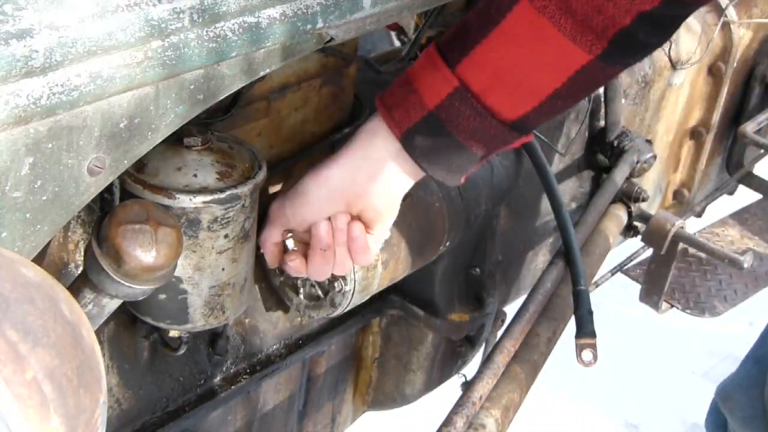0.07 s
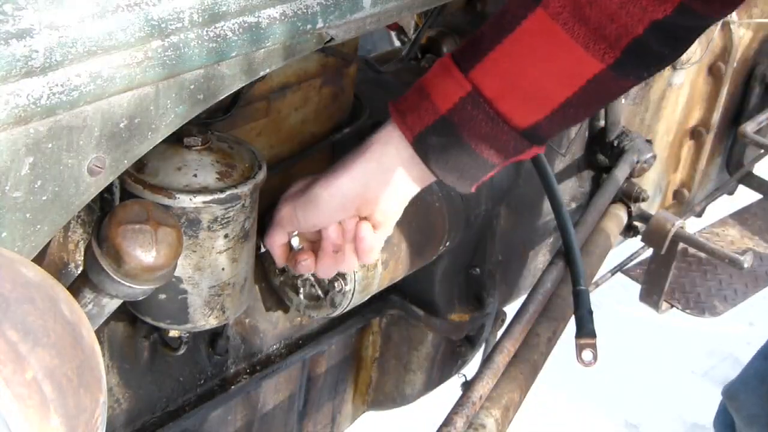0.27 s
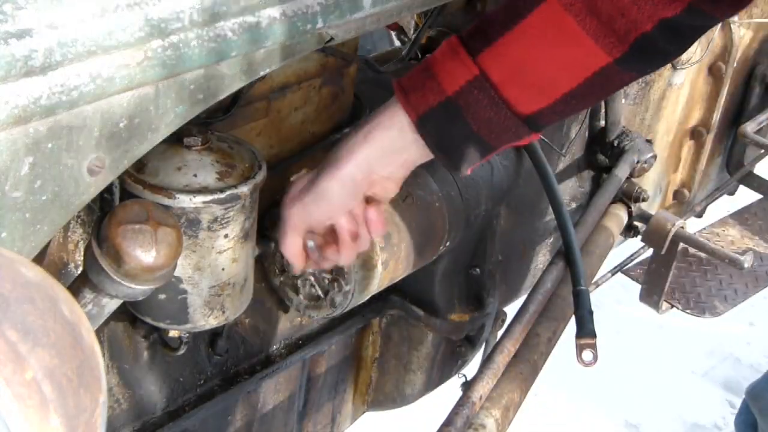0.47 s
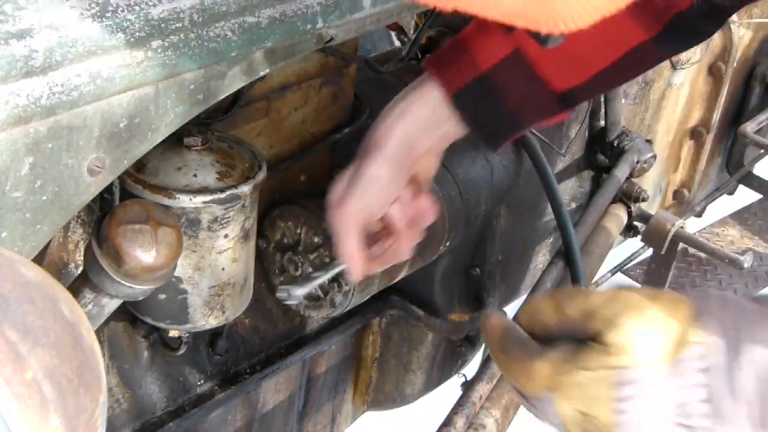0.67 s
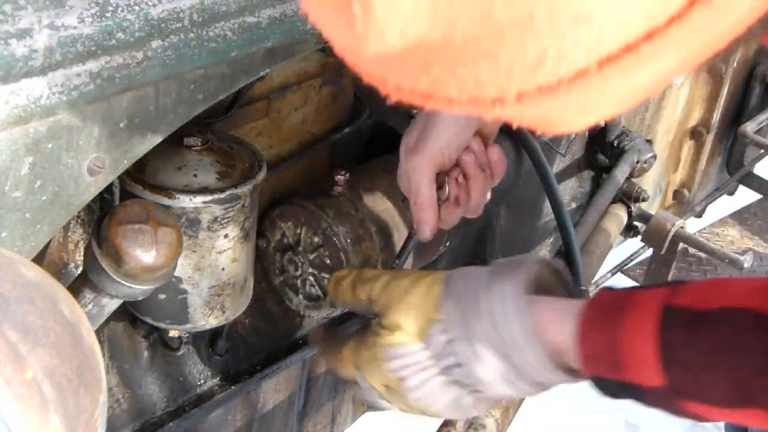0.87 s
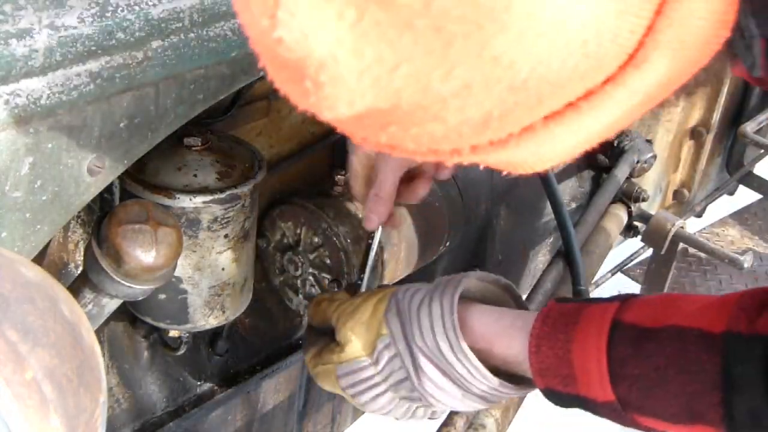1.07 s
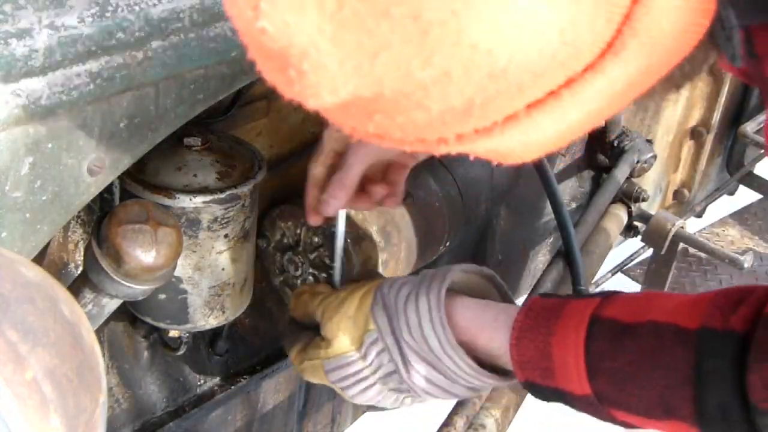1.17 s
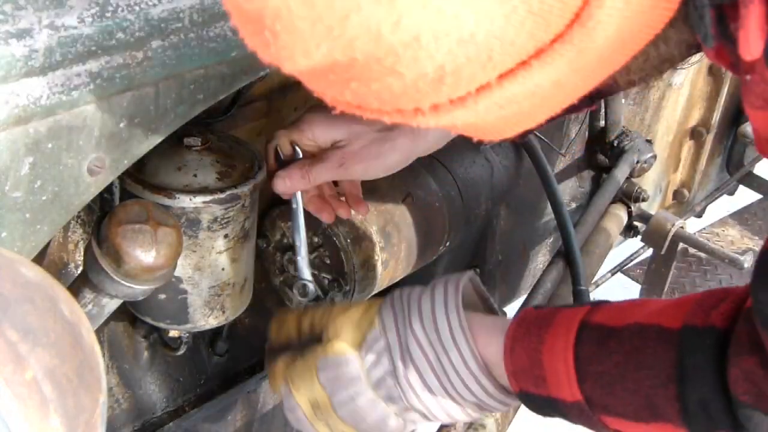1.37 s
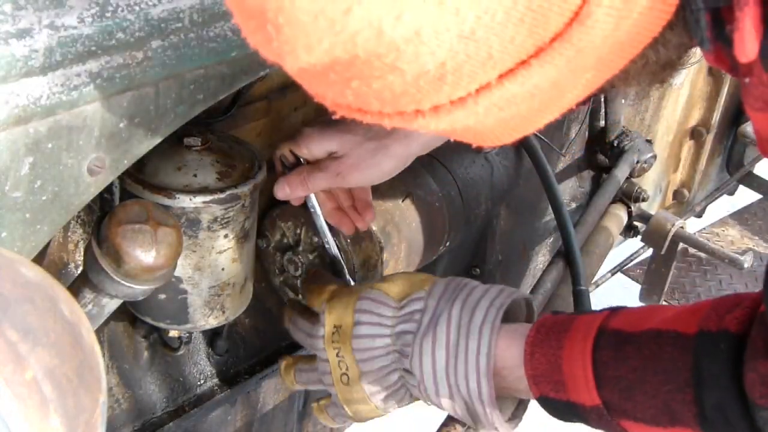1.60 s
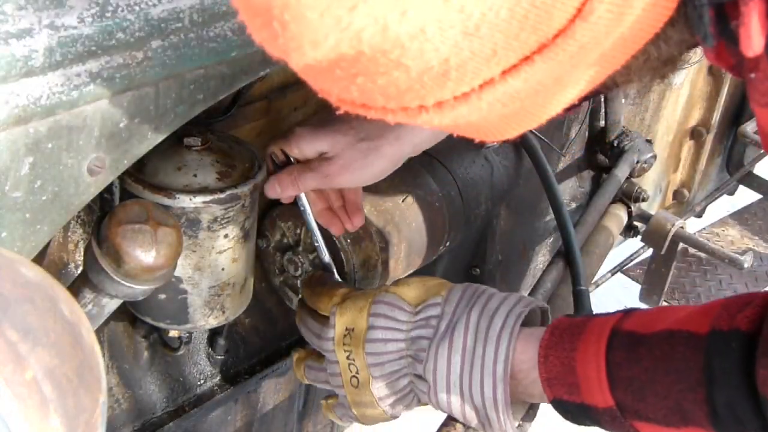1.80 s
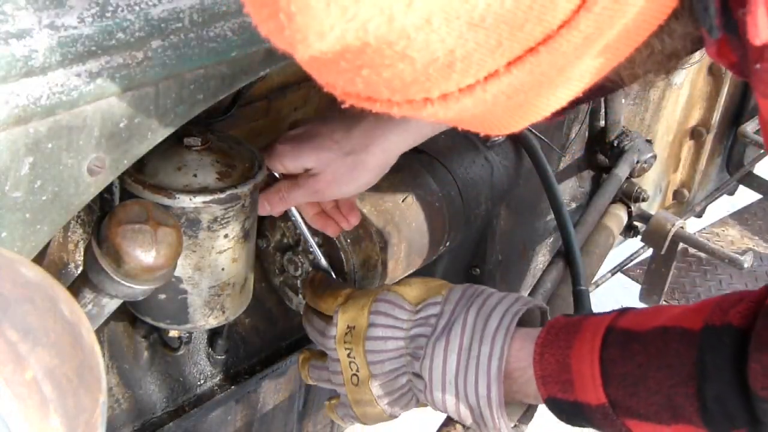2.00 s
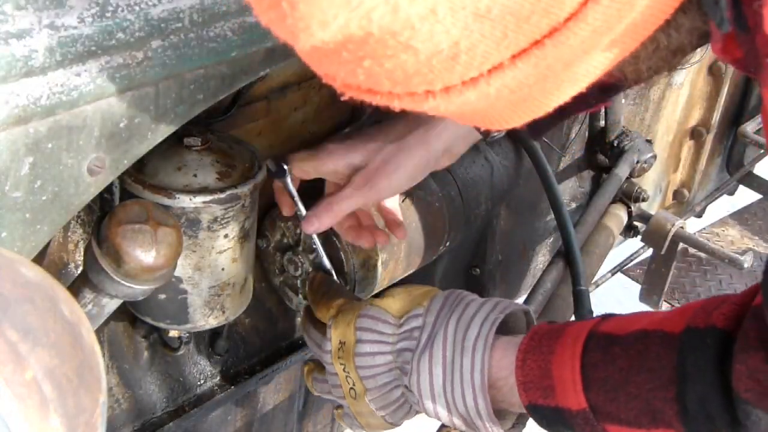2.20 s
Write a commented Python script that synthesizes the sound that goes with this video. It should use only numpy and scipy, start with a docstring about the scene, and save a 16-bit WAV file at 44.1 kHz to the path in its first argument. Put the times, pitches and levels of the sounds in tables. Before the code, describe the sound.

Wrench clicks on a bolt, close and dry in stereo. Soft dull hand knocks and low rubbing at 0.2-0.4 s; a bright, bouncing steel click pair at 0.56-0.6 s. Cloth rustles around 1 s with muffled knocks at 1.03-1.16 s. A click at 1.62 s leaves a faint housing hum; small gritty scrapes and a weak tick lead to a sharp click at 2.0 s. Quiet, wide background hiss.

```python
"""Wrench on a starter-motor bolt

At an engine, a close stereo pair hears a steel wrench fitted to a bolt: noise cracks over ringing modes,
while the motor housing swells into a hum after the clicks and short slides scrape as trains of slips.
Hands knock softly and dully near the microphones, as brief low swings with a rattle and a tick.
A sleeve rustles and something rubs low, both shaped noise, over a quiet, wide noise floor.
"""
import sys
import numpy as np
from scipy import signal
from scipy.fft import rfft, irfft, next_fast_len
from scipy.io import wavfile
from scipy.ndimage import map_coordinates

SR = 44100
rng = np.random.default_rng(int(sys.argv[2]) if len(sys.argv) > 2 else 0)


def unload_wav(signal):
    """Save mono or channel-first audio to the path in sys.argv[1] as 16-bit WAV at rate SR, clipped to [-1, 1]."""
    wavfile.write(
        sys.argv[1],
        SR,
        np.round(np.clip(np.atleast_2d(signal).T, -1, 1) * 32767).astype(np.int16),
    )


N = 99225  # samples in the scene
T = np.arange(SR * 3 // 5) / SR  # seconds since the start of one event


# Ringing modes of the wrench: [pitch_hz, level_db]
WRENCH = [(1350, -10), (2790, -9), (3290, -2), (3550, -7), (3830, -5), (4300, -5), (4750, -6), (4970, -6),
          (5190, -2), (6230, -2), (6850, -7), (7600, -6), (8330, -3), (8620, -7), (9140, 1.5), (9750, -5),
          (10720, -9), (11500, -7), (12130, -9), (13930, -3)]
WRENCH_T60_S = 0.04  # before any length factor


def wrench_modes():
    """The wrench's modes all die at one speed."""
    return [(hz, db, WRENCH_T60_S) for hz, db in WRENCH]


# Wrench contacts: [start_s, crack_db, wrench_db, bolt_db, housing_db, tilt_db_per_octave,
# first_region_hz, first_region_db, second_region_hz, second_region_db, decay_length_factor].
# The point of contact favours or mutes the two regions in the crack and the wrench.
CONTACTS = [ (0.5599, -35.5, -30.5, -21.5, -40, -4.5, 3700, 8.7, 11000, 10, 1.06),
            (0.6011, -23.5, -23, -19, -41.5, 1.5, 9100, 2.6, 4340, -1.5, 0.54),
            (1.6214, -26, -29, -27.5, -32, -1.5, 3390, 9, 4500, 3.5, 1),
            (1.8419, -34.5, -36.5, -69, -56, -2, 6350, 13.7, 11050, 15, 0.65),
            (2.0017, -24, -25.5, -21.5, -31.5, -1.5, 8880, 12.1, 6730, -30, 0.47),
            (2.004, -30.5, -39.5, -26, -44, -2.5, 5200, 21.8, 13500, 21, 0.55)]
# The wrench bouncing on the bolt: [start_s, level_db]
REBOUNDS = [(0.5628, -21.5), (0.5661, -18.5), (0.5722, -34), (0.6103, -29), (0.6270, -34)]
# Dense, quickly dying part of a click: [band_centre_hz, level_db, t60_s before the length factor]
CRACK = [(370, -25, 0.02), (800, -17, 0.083), (1340, -10.5, 0.064), (2360, -19, 0.17), (3700, -18, 0.17),
         (7500, 2, 0.026), (13100, -13, 0.02)]
# Ringing modes of the bolt: [pitch_hz, level_db, t60_s before any length factor]
BOLT = [(1950, -9, .04), (2078, -1, .042), (2385, -1, .04), (2490, -7, .065)]
# Humming modes of the motor housing: [pitch_hz, level_db, t60_s]
HOUSING = [(233.5, -5, 0.67), (272.4, 3.5, 0.26), (323.7, 0, 0.26), (390, -8.5, 0.3)]
CRACK_ATTACK_S, METAL_ATTACK_S, HOUSING_ATTACK_S = 0.00047, 0.00034, 0.021
SNAP_DB, SNAP_S = 14, 0.00061  # extra burst at the very start of a crack
CRACK_WIDTH = 0.33  # side over mid
FOCUS_OCTAVES = 0.14  # reach of a favoured or muted region
BOLT_BLUR = 2.6  # unsteadiness of the bolt's phase
PAN_DB = 2  # wrench leans to the first microphone, bolt to the second
CONTACT_LOW_CUT_HZ = 154


def wrench():
    """Contacts crack and ring the wrench by where they land, ring the bolt and hum the housing; rebounds ring the bolt."""
    out = np.zeros((2, N))
    pan = amp([[PAN_DB / 2], [-PAN_DB / 2]])
    snap = (1 + amp(SNAP_DB) * np.exp(-(T / SNAP_S) ** 2)) / 2
    for (s, crack_db, wrench_db, bolt_db, housing_db, tilt_db,
         first_hz, first_db, second_hz, second_db, length) in CONTACTS:
        def excite(hz):
            """Gain of crack and wrench at one frequency for this point of contact."""
            def near(centre):
                return np.exp(-(np.log2(hz / centre) / FOCUS_OCTAVES) ** 2)
            tilt = tilt_db * np.log2(hz / 5000)
            return amp(tilt + first_db * near(first_hz) + second_db * near(second_hz))

        crack = amp(crack_db) * burst(CRACK, CRACK_WIDTH, excite, length)
        crack = crack * rise(CRACK_ATTACK_S) * snap
        steel = amp(wrench_db) * ring(wrench_modes(), blur=5.0, gain=excite, length=length)
        bolt = amp(bolt_db) * ring(BOLT, BOLT_BLUR, length=length)
        # the hum reaches both microphones alike
        hum = amp(housing_db) * ring(HOUSING, blur=5.46).mean(axis=0) * rise(HOUSING_ATTACK_S)
        add(out, s, crack * pan + (steel * pan + bolt / pan) * rise(METAL_ATTACK_S) + hum)
    for s, db in REBOUNDS:
        add(out, s, amp(db) * ring(BOLT, BOLT_BLUR) / pan * rise(METAL_ATTACK_S))
    return low_cut(out, CONTACT_LOW_CUT_HZ)


# Jaw sliding on the bolt head: [start_s, length_s, level_db, treble_db]
SCRAPES = [(0.528, 0.016, -41, -9), (1.472, 0.01, -43, -5.5), (1.476, 0.045, -40.5, -14),
           (1.725, 0.032, -48, -3.5), (1.905, 0.088, -48.5, -4.5), (1.935, 0.026, -44, 0),
           (1.953, 0.019, -43, -9), (1.99, 0.0095, -37.5, -5)]
# Colour of steel grit, also used for the tick of a knock: [frequency_hz, level_db]
GRIT_COLOUR = [(100, -13.5), (450, 5), (950, -6.5), (1500, 6), (2400, 2.5), (3400, -1.5), (5500, -4.5),
               (15000, -27)]
STROKE_RISE, ROUGH_DB = 0.17, -0.5  # share of the stroke spent rising; depth of the grit
SLIPS_PER_S, SLIP_S, SLIP_DB = 300, 0.00083, 7.5  # typical rate, and fade and strength of a slip's puff
TREBLE_HZ = 3020  # each scrape's treble level acts above this
FLECK_DB, FLECK_TOP_HZ, FLECK_LENGTH = 0.5, 7000, 0.75  # ringing of slips: level, top, decay length factor


def scrapes():
    """Short slides of steel on steel: an uneven train of slips, each a puff of grit that briefly rings the metal."""
    out = np.zeros((2, N))
    for s, length, db, treble_db in SCRAPES:
        slip_rate = SLIPS_PER_S * amp(2.7 * flutter(len(T), rate=180))
        turns = np.cumsum(slip_rate) / SR  # one whole turn per slip
        puffs = 1 + amp(SLIP_DB) * np.exp(-(turns % 1) / SLIPS_PER_S / SLIP_S)
        roughness = amp(ROUGH_DB * flutter(len(T), rate=543))
        grit = coloured(noise(len(T), width=0.22) * puffs * roughness, GRIT_COLOUR)

        slips = np.diff(np.floor(turns), prepend=0) * rng.standard_normal(len(T))
        metal = ring(wrench_modes() + BOLT, blur=1.3,
                     gain=lambda hz: 1 / (1 + (hz / FLECK_TOP_HZ) ** 4), length=FLECK_LENGTH)
        flecks = unit(signal.fftconvolve(slips[None], metal, axes=1)[:, :len(T)])

        scrape = grit + amp(FLECK_DB) * flecks
        scrape = unit(filtered(scrape, lambda hz: amp(treble_db / (1 + (TREBLE_HZ / hz) ** 10))))
        stroke = np.sqrt(np.interp(T / length, [0, STROKE_RISE, 1], [0, 1, 0]))
        add(out, s, amp(db) * stroke * scrape)
    return out


# Dull knocks of the hands: [start_s, level_db, pitch_hz]
KNOCKS = [(0.221, -32, 262), (0.23, -31.5, 340), (0.2441, -27.5, 392), (0.25, -29, 392), (0.2592, -45, 358),
          (0.2767, -27, 380), (0.2939, -24, 360), (0.3074, -22, 380), (0.414, -20, 335), (1.026, -20, 313),
          (1.0340, -25, 298), (1.0807, -25, 385), (1.0843, -15.5, 274), (1.1584, -20.5, 405)]
# What rattles on after a knock: [band_centre_hz, level_db, t60_s]
KNOCK_TAIL = [(186, -5.5, 0.14), (436, 3.5, 0.061), (804, 0.5, 0.04)]
KNOCK_SWELL_S, KNOCK_TAIL_DB, KNOCK_LOW_CUT_HZ = 0.0012, -15, 142
TICK_DB, TICK_GROWTH = 8.5, 1.33  # tick over swing: dB for a 0 dB knock, dB more per dB of knock
TICK_T60_S = 0.028


def knocks():
    """Soft contacts: a brief swing, a short rattle and a faint tick that grows with force."""
    out = np.zeros((2, N))
    for s, db, hz in KNOCKS:
        u = T / KNOCK_SWELL_S
        swell = (u / 2) ** 2 * np.exp(2 - u)  # peaks at 1
        swing = swell * np.cos(2 * np.pi * hz * T)
        tail = amp(KNOCK_TAIL_DB) * burst(KNOCK_TAIL, width=0.017) * rise(0.0008)
        tick = coloured(noise(len(T), width=0.2), GRIT_COLOUR, tilt_db=-3.5)
        tick = amp(TICK_DB + TICK_GROWTH * db) * tick * decay(TICK_T60_S) * rise(0.00071)
        add(out, s, amp(db) * (swing + tail + tick))
    return low_cut(out, KNOCK_LOW_CUT_HZ)


# Level of the sleeve rustle: [time_s, level_db]
SLEEVE = [(.15, -59), (.2, -47), (.28, -54), (.8, -51), (.96, -44.5), (1.1, -50.5), (1.5, -57.5),
          (1.54, -49.5), (1.555, -103)]
# Colour of the sleeve: [frequency_hz, level_db]
SLEEVE_COLOUR = [(100, -20), (450, -0.5), (1700, 1.5), (3000, -2), (13000, -10), (15500, -24)]
# Level of the low rubbing and rumble: [time_s, level_db]
RUB = [(.16, -58.5), (.24, -37), (.33, -45), (.49, -57), (.56, -47.5), (.7, -59), (1.1, -49), (1.42, -79),
       (1.7, -58), (1.76, -48.5), (1.84, -56.5)]
# Colour of the rubbing: [frequency_hz, level_db]
RUB_COLOUR = [(25, -46), (70, -19), (150, -12.5), (240, 2.5), (360, 0.5), (900, -13.5), (3000, -49)]


def handling():
    """Cloth hiss and low rubbing follow the arms' movement."""
    cloth = coloured(noise(N, width=0.66) * amp(1.4 * flutter(N, rate=860)), SLEEVE_COLOUR)
    rub = coloured(noise(N, width=0.052) * amp(2.3 * flutter(N, rate=150)), RUB_COLOUR)
    return level(SLEEVE) * cloth + level(RUB) * rub


# Reflections around the metal: [band_centre_hz, level_db, t60_s]
ROOM = [(416, 6, 0.23), (2080, -7.5, 0.4), (8400, 0.5, 0.12)]
ROOM_DB = -15.5


def room(x):
    """Faint reflections from the machine and its surroundings."""
    tail = burst(ROOM, width=0.23) * rise(0.0021)
    tail = tail / np.linalg.norm(tail[0])
    return amp(ROOM_DB) * signal.fftconvolve(x, tail, axes=1)[:, :N]


# Colour of the quiet background: [frequency_hz, level_db]
FLOOR_COLOUR = [(20, -49), (60, -0.5), (300, 0), (1300, -5), (13000, -12.5), (16000, -32)]
FLOOR_DB = -54


def background():
    """Steady shaped noise, with mid and side equally strong."""
    return amp(FLOOR_DB) * coloured(noise(N, width=1.0), FLOOR_COLOUR)


def amp(db):
    """Amplitude factor for a level in dB."""
    return 10 ** (np.asarray(db) / 20)


def unit(x):
    """x scaled to rms 1."""
    return x / np.sqrt(np.mean(x ** 2) + 1e-20)


def decay(t60):
    """Exponential fall by 60 dB in t60 seconds."""
    return np.exp(-np.log(1000) * T / t60)


def rise(seconds):
    """Exponential approach to 1 with this time constant."""
    return 1 - np.exp(-T / seconds)


def filtered(x, response):
    """x times a response of frequency."""
    n = x.shape[-1]
    m = next_fast_len(n + 4096)  # padding for the filter's ringing
    hz = np.fft.rfftfreq(m, 1 / SR) + 1  # 1 Hz up, so that no frequency is zero
    return irfft(rfft(x, m) * response(hz), m)[..., :n]


def low_cut(x, corner_hz):
    """Two gentle one-pole high-pass stages."""
    return filtered(x, lambda hz: (1j * hz / (1j * hz + corner_hz)) ** 2)


def noise(n, width):
    """White stereo noise; width is side over mid."""
    mid, side = rng.standard_normal((2, n))
    return np.array([mid + width * side, mid - width * side])


def coloured(x, colour, tilt_db=0):
    """x shaped by (Hz, dB) points and a tilt per octave, at rms 1."""
    hz, db = np.transpose(colour)

    def response(f):
        return amp(np.interp(np.log(f), np.log(hz), db) + tilt_db * np.log2(f))
    return unit(filtered(x, response))


def flutter(n, rate):
    """A random curve, straight between rate knots a second."""
    at = np.arange(n) * rate / SR
    return map_coordinates(rng.standard_normal(4096), [at], order=1, mode="wrap")


def level(rows):
    """Gain per sample from (s, dB) points."""
    return amp(np.interp(np.arange(N) / SR, *np.transpose(rows)))


def add(out, s, sound):
    """Mix a sound in at time s."""
    part = out[:, round(s * SR):][:, :sound.shape[-1]]
    part += sound[..., :part.shape[1]]


def burst(bands, width, gain=lambda hz: 1, length=1):
    """Noise in adjoining bands, each dying at its own speed."""
    white = noise(len(T), width)
    centres = np.log([band[0] for band in bands])
    knots = np.r_[centres[0] - 1, centres, centres[-1] + .5]
    out = 0
    # each share is a triangle: 1 at its own centre, 0 at the neighbours
    for (hz, db, t60), share in zip(bands, np.eye(len(knots))[1:]):
        band = unit(filtered(white, lambda f: np.interp(np.log(f), knots, share)))
        out = out + band * amp(db) * gain(hz) * decay(t60 * length)
    return out


MIC_PHASE = 0.37  # radians ahead at one microphone and behind at the other


def ring(modes, blur, gain=lambda hz: 1, length=1):
    """Damped, slightly unsteady modes that reach each microphone with their own phase."""
    out = 0
    for hz, db, t60 in modes:
        skew = MIC_PHASE * rng.choice([-1, 1]) * np.array([[1], [-1]])
        drift = blur * np.cumsum(rng.standard_normal(len(T))) / np.sqrt(SR * t60)
        wave = np.sin(2 * np.pi * hz * T + drift + skew)
        out = out + amp(db) * gain(hz) * decay(t60 * length) * wave
    return out


def scene():
    """Metal with its reflections, then the close hands and cloth, over the background."""
    metal = wrench() + scrapes()
    return metal + room(metal) + knocks() + handling() + background()


MONO_BELOW_HZ, TOP_HZ = 540, 16200


def record(dry):
    """Two close microphones hear the bass alike; the recorder keeps nothing above its band limit."""
    mid = dry.mean(axis=0)
    side = filtered(dry - mid, lambda hz: hz ** 2 / (hz ** 2 + MONO_BELOW_HZ ** 2))
    # the band limit is a slope 1200 Hz wide, centred on TOP_HZ
    return filtered(mid + side, lambda hz: np.clip((TOP_HZ - hz) / 1200 + .5, 0, 1) ** 2)


dry = scene()
out = record(dry)
unload_wav(out)
```